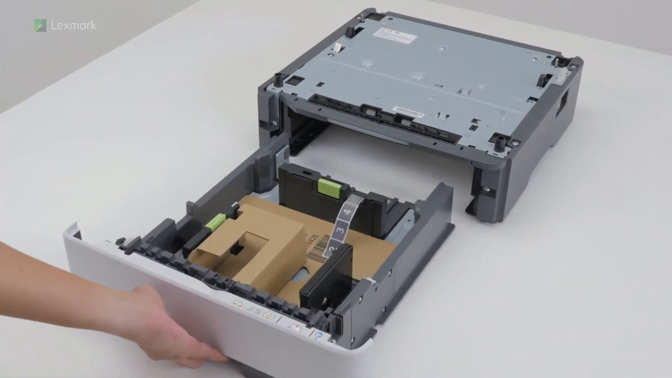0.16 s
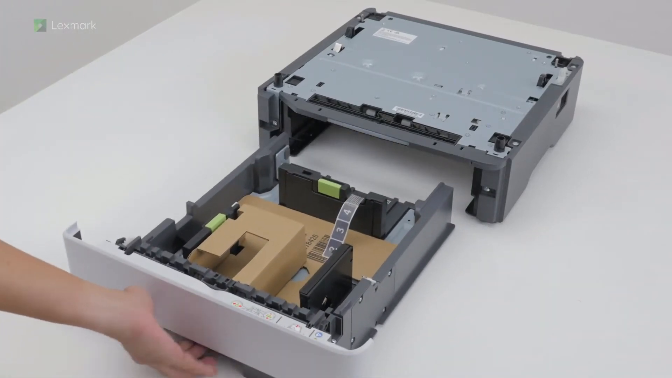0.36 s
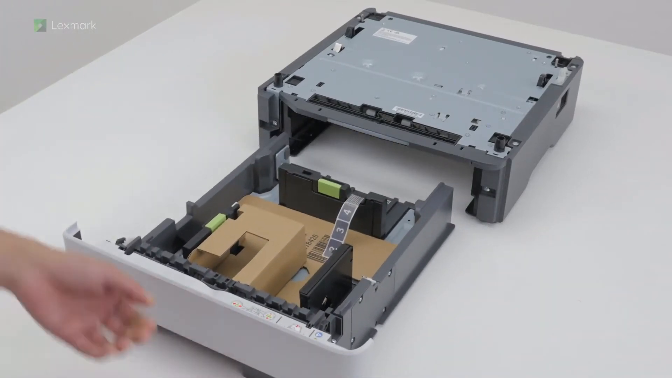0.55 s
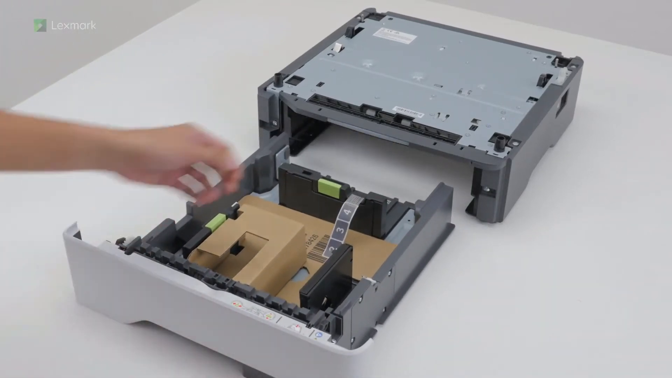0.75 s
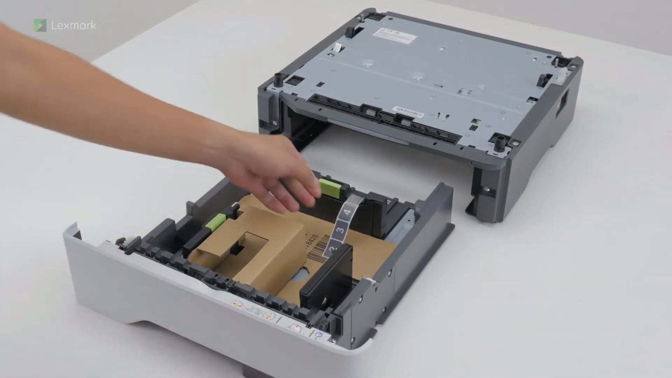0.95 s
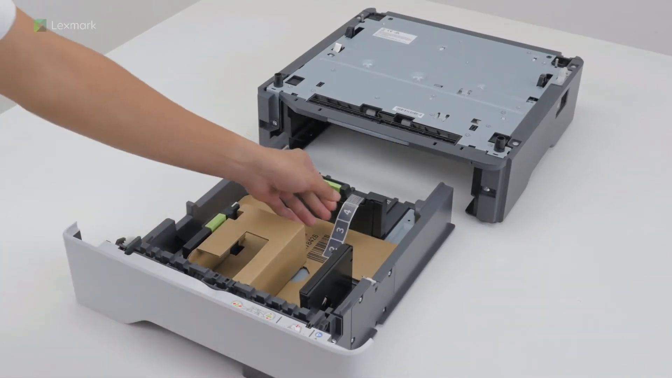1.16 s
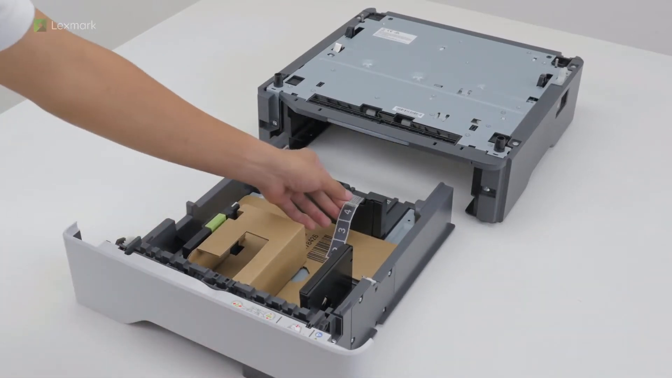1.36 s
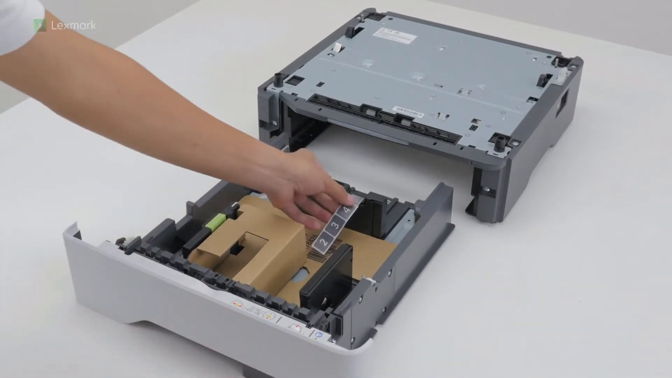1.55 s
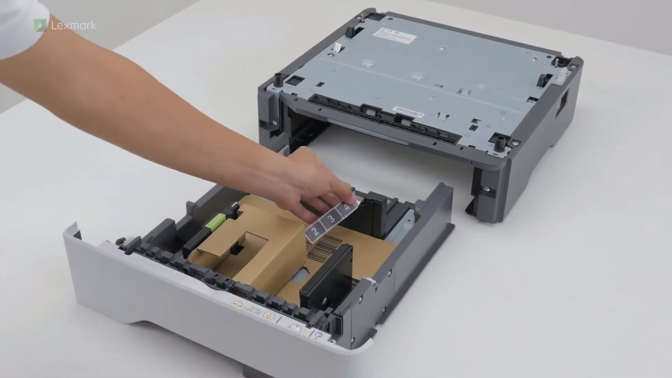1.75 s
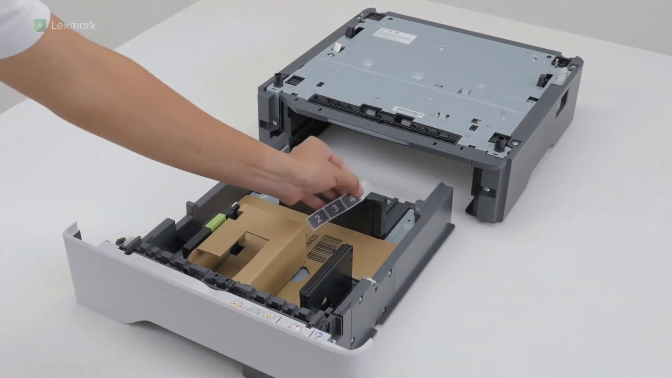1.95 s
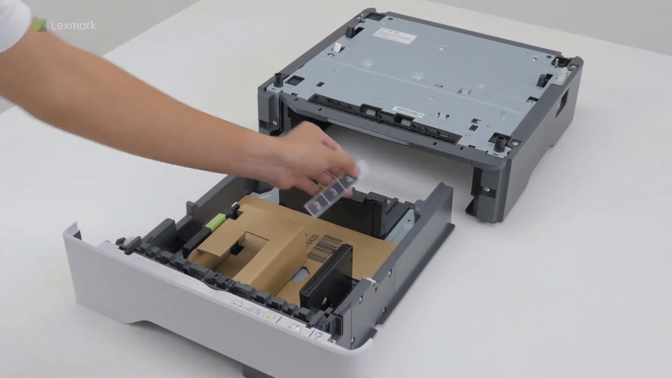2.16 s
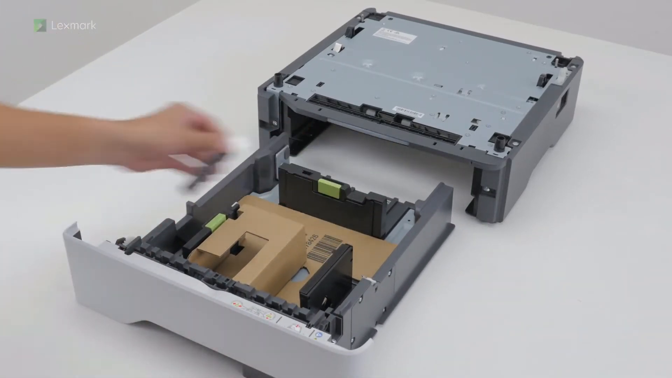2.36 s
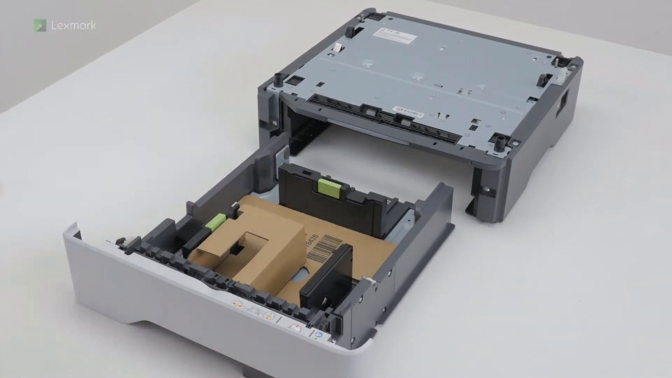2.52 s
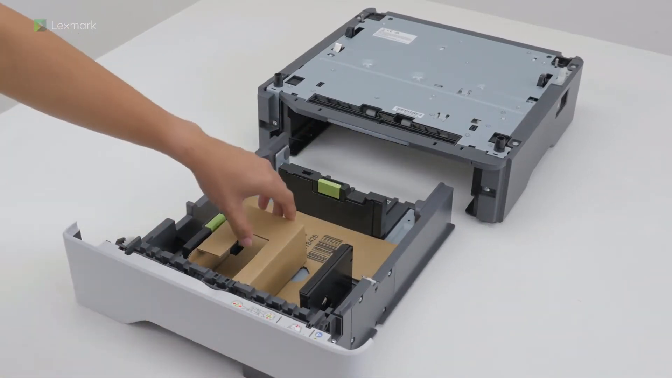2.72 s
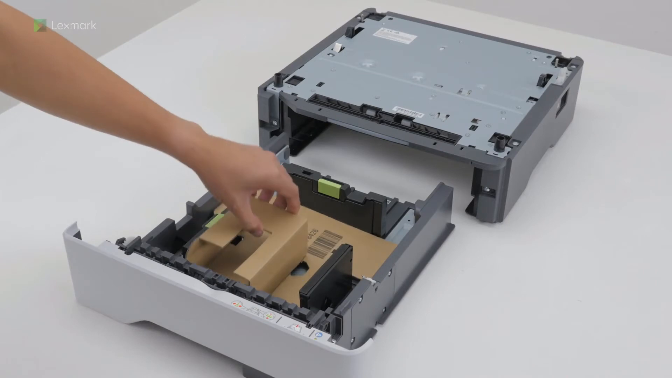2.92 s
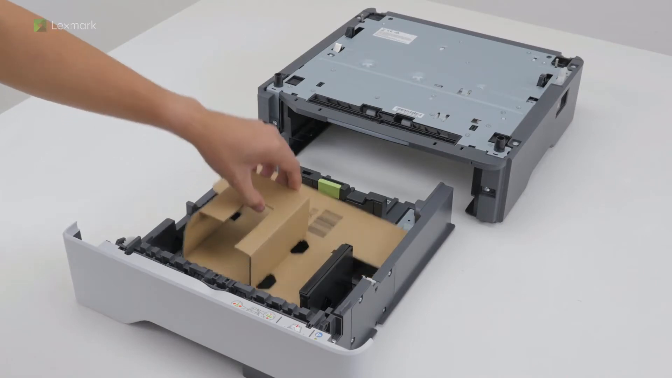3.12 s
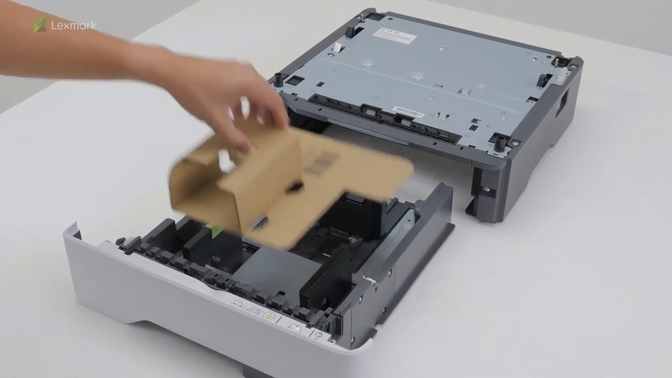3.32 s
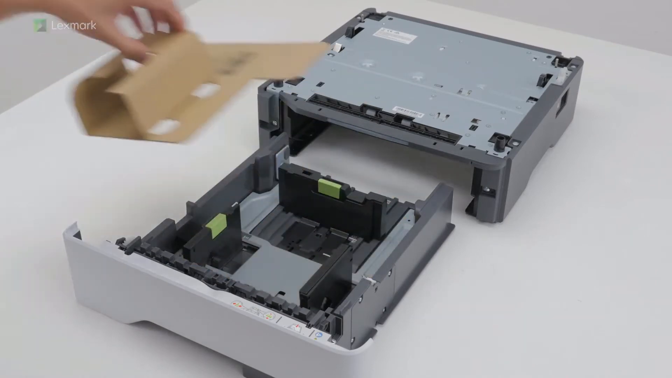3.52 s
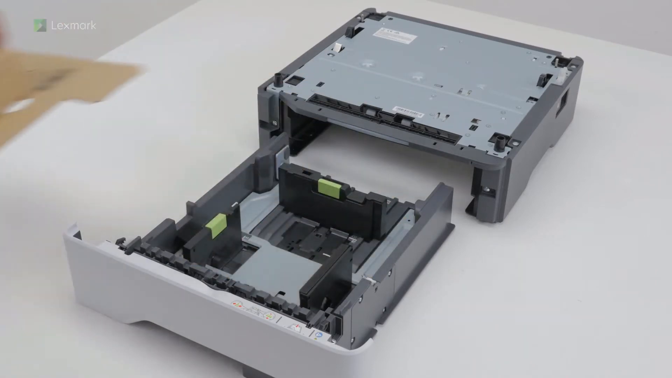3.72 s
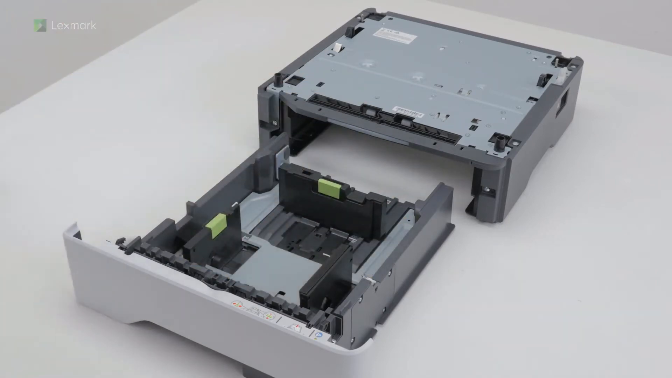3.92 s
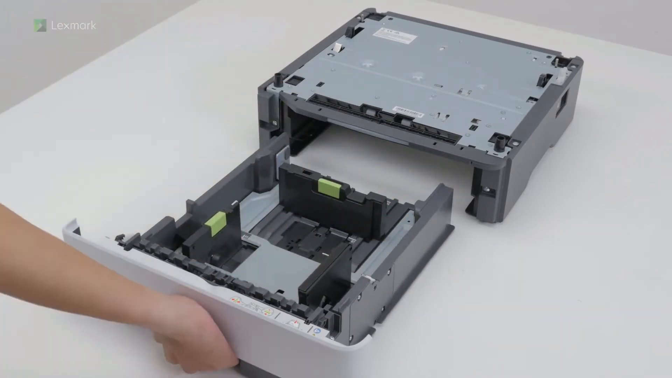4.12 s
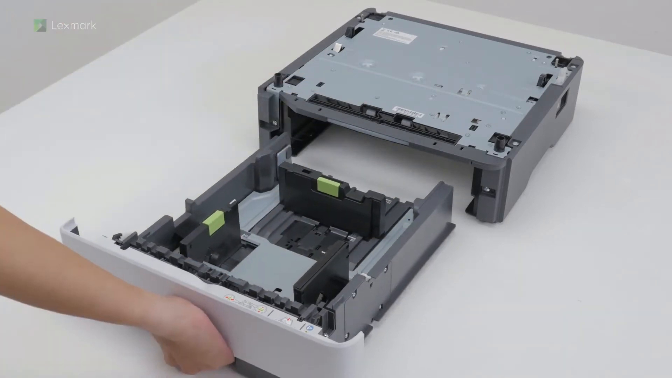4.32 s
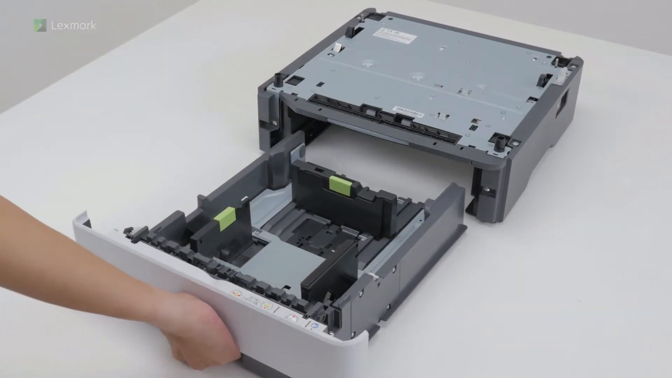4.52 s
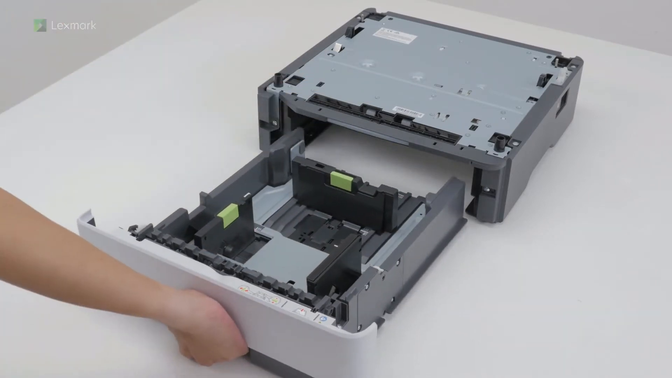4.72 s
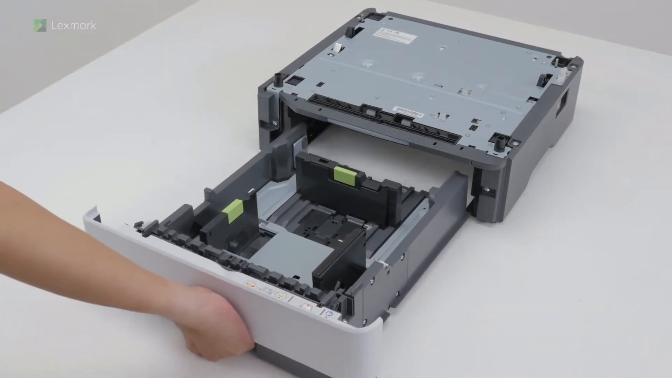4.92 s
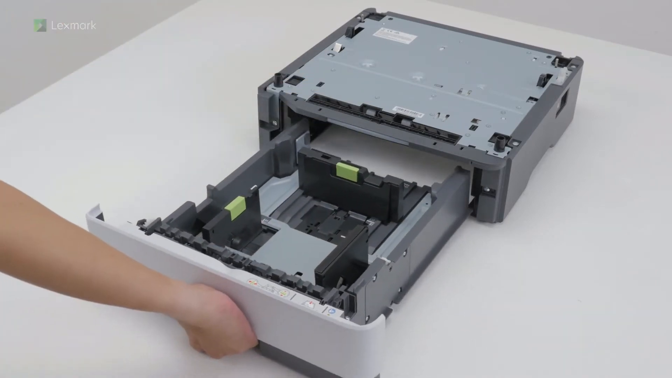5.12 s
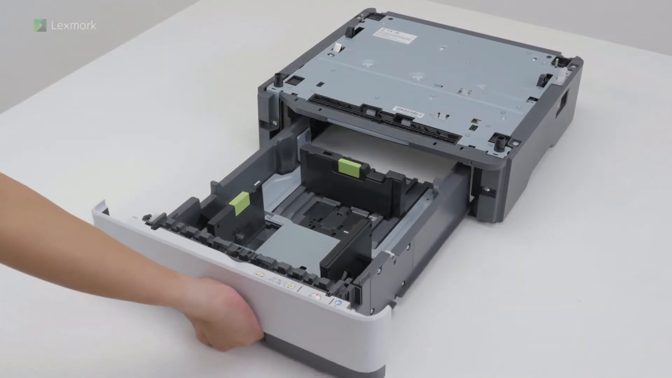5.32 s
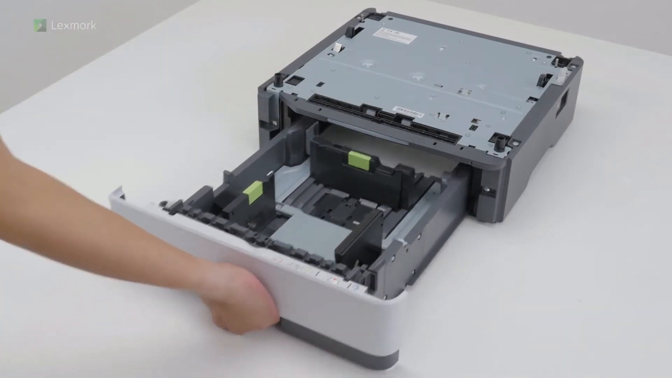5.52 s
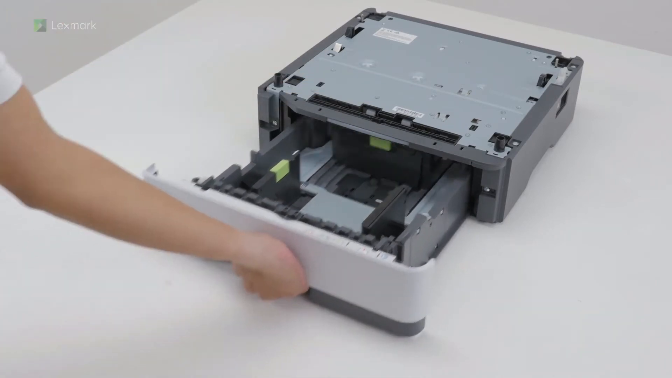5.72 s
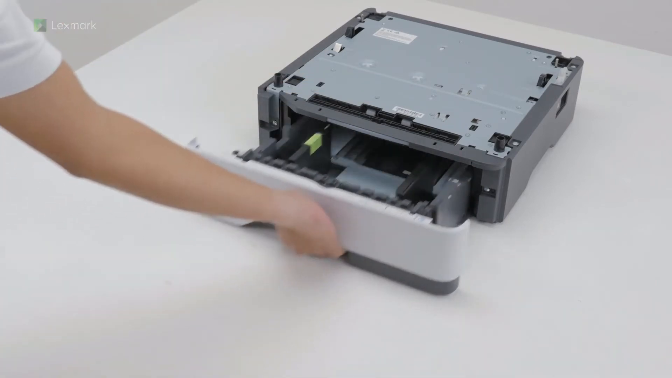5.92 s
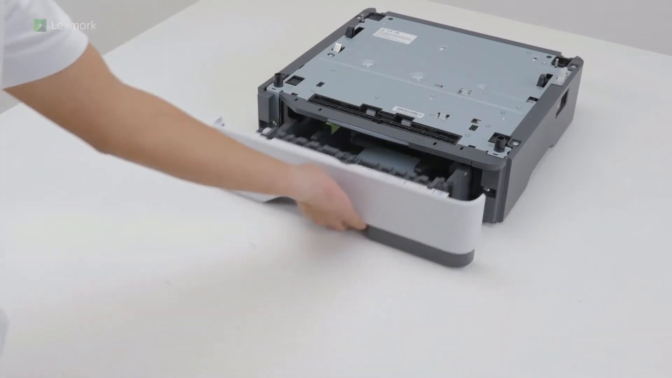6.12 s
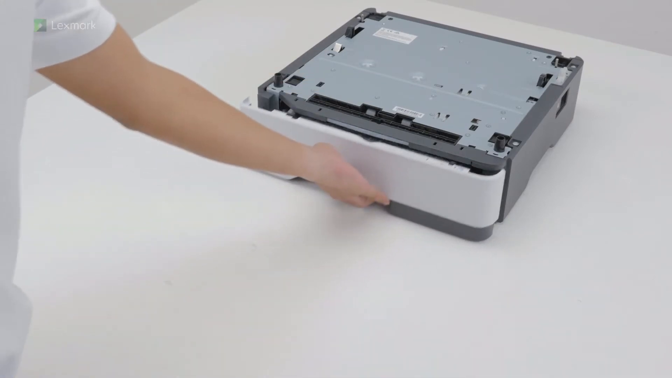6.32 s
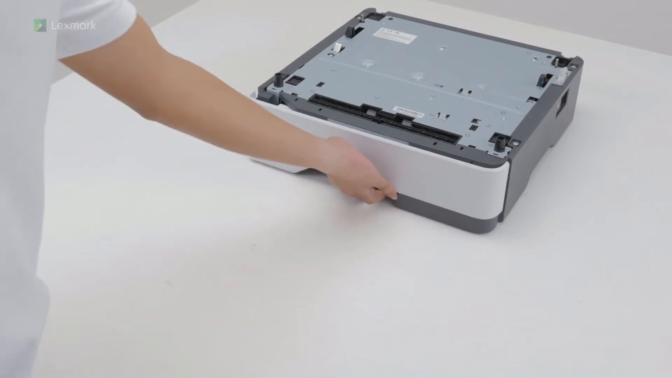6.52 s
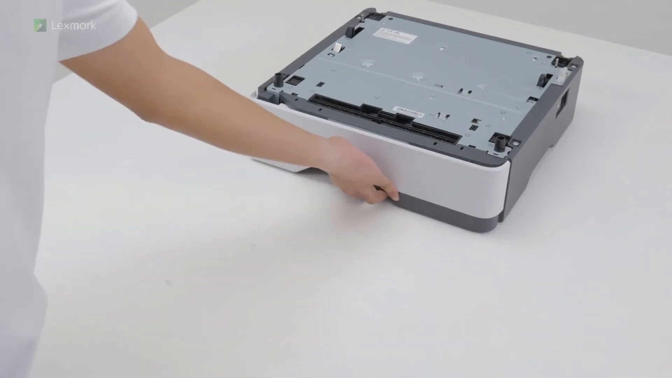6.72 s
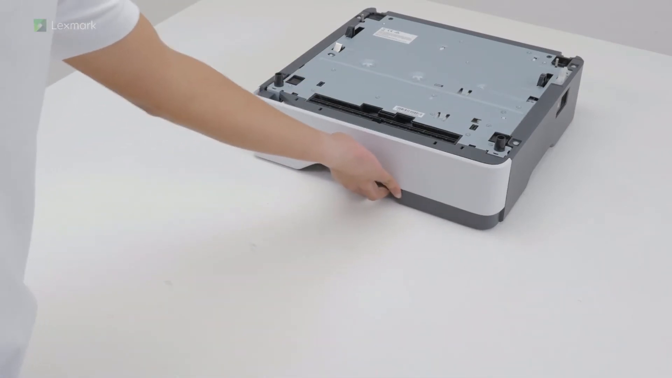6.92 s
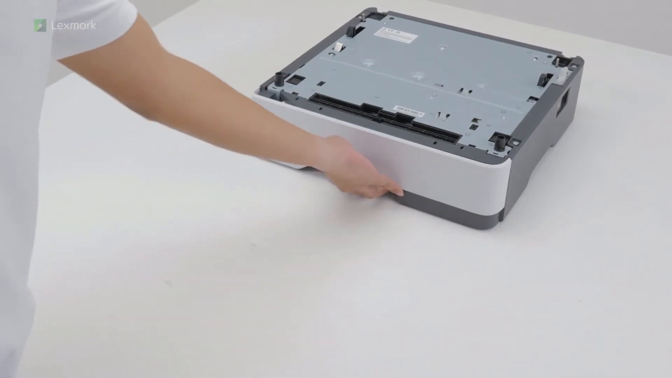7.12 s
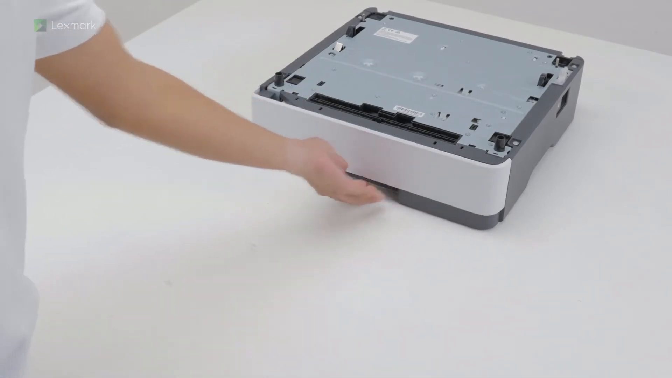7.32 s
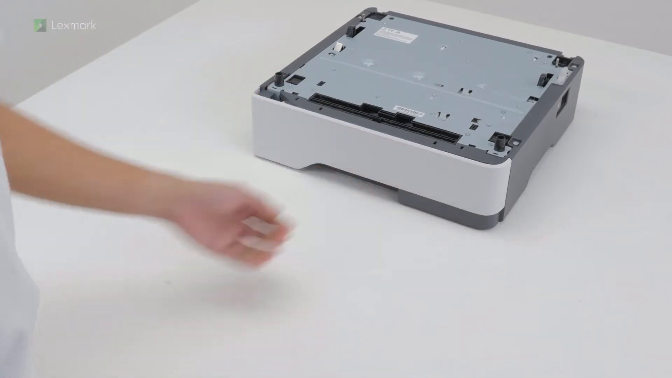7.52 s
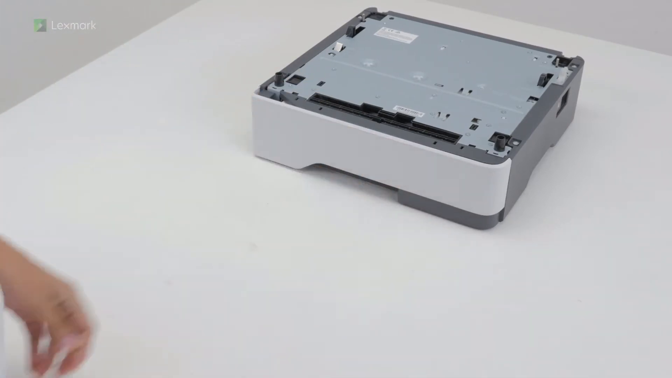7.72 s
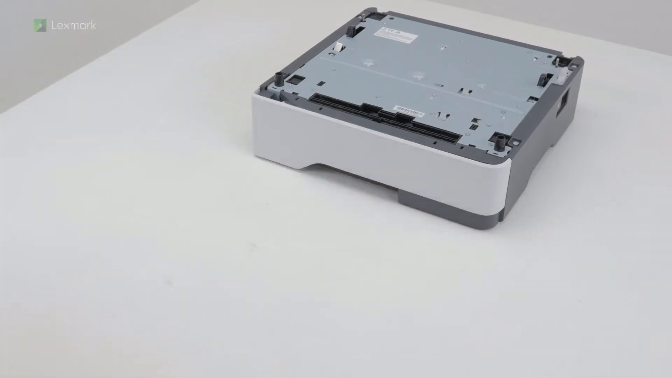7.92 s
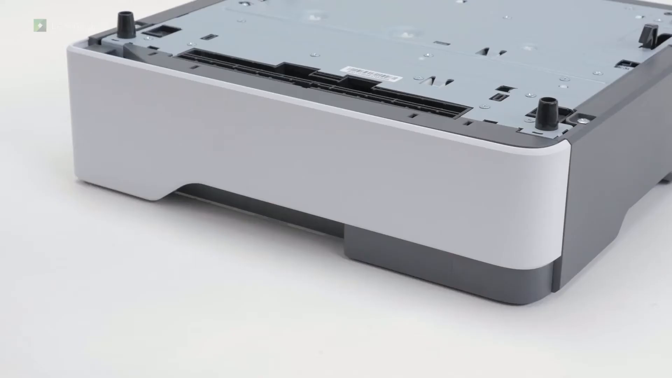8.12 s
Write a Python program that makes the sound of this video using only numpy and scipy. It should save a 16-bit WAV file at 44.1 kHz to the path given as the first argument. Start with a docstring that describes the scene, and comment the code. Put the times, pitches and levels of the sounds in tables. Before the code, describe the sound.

Tape peels and cardboard scrapes out of a plastic printer tray, which then clatters along its rails and knocks home.

```python
"""A plastic paper tray knocks, rattles and slides on a table top. It is set down, a strip of tape is
peeled off, a cardboard insert is lifted out, then the tray is raised, slid along its rails and pushed home.
Every knock rattles the loose plastic parts and booms in the table. Rubbing makes a gritty scrape, and the
tape's glue lets go in tiny snaps. Behind it all, a small room echoes and ventilation hums."""
import sys
import numpy as np
from scipy import signal
from scipy.fft import rfft, irfft, next_fast_len
from scipy.io import wavfile
from scipy.ndimage import uniform_filter1d

SR = 44100
rng = np.random.default_rng(int(sys.argv[2]) if len(sys.argv) > 2 else 0)


def wav_out(sig):
    """Save sig, one row per channel (or a flat mono array), as 16-bit PCM at SR to the path in sys.argv[1]."""
    wavfile.write(sys.argv[1], SR, np.round(np.clip(np.atleast_2d(sig).T, -1, 1) * 32767).astype(np.int16))


N = 364266

# Knocks on the tray; hardness is how strong the sharp rap is next to the dull thud:
# (time [s], thud level [dB], table boom level [dB], hardness [dB], time to fade by 60 dB [ms])
KNOCKS = [(0.108, -31.5, -24, -16, 68), (0.121, -30.5, -40.5, -10, 45), (0.247, -58, -46, -15, 62),
          (0.304, -53.5, -58, -13, 110), (0.321, -48.5, -52, -12, 75), (0.424, -56, -63, -16, 160),
          (1.954, -32.5, -40, -11.5, 54), (1.964, -36, -38, -21, 78), (2.033, -48, -57, -34.5, 42),
          (3.089, -36, -62, -14, 54), (3.102, -39.5, -40, -8, 32), (3.15, -33, -53, -13.5, 32),
          (3.174, -35, -43, -18, 210), (3.187, -49.5, -60, -2, 22), (3.193, -38.5, -42, -1.5, 140),
          (3.217, -32, -36.5, -1.5, 31), (3.239, -35, -68, -5, 11), (4, -57, -61, -20.5, 58),
          (4.129, -47, -53.5, -20, 114), (4.324, -32, -25, -14, 44), (4.335, -33.5, -43, -1, 88),
          (4.378, -24, -50, -19, 62), (4.391, -39, -29, 0, 40), (4.464, -53, -36, -14, 150),
          (4.573, -48.5, -35.5, -7, 130), (5.218, -28, -44, -22, 34), (5.224, -33.5, -34, -5.5, 150),
          (5.24, -43, -38, 7.5, 69), (5.274, -45, -37, -8, 100), (5.329, -33, -38.5, -16.5, 100),
          (5.355, -70, -60, 11.5, 40), (5.395, -69.5, -55, 12, 36), (5.446, -37.5, -61, -8, 330),
          (5.464, -36, -52, -1.5, 280), (5.525, -29.5, -33, -5, 175), (5.549, -36, -33, 1, 160),
          (5.58, -34, -48, -3, 37), (5.647, -64.5, -75, 13.5, 23), (5.731, -38, -73, -16, 58),
          (5.74, -53.5, -67, 7, 44), (5.753, -28, -43, -21.5, 85), (5.88, -39, -49.5, -9.5, 72),
          (5.906, -51.5, -52, 10.5, 72), (5.96, -36, -53, -21, 40), (5.985, -32, -46, -15, 120),
          (6.019, -42.5, -46.5, -6.5, 280), (6.116, -50, -57.5, -2, 19), (6.18, -32.5, -45, -15, 32),
          (6.307, -49, -51.5, -5, 78), (6.372, -30.5, -36.5, -8.5, 114), (6.39, -29, -40, -11.5, 46),
          (6.408, -37, -40.5, -6.5, 67), (6.459, -36, -49, 16, 24.5), (6.58, -41, -37.5, -21, 166),
          (6.629, -51.5, -43, -12.5, 70), (6.859, -54.5, -65, -20, 250), (6.903, -38.5, -46.5, -9.5, 160),
          (6.917, -26.5, -35, -9, 86), (6.928, -17, -28.5, -6, 100), (6.936, -16.5, -25, -17.5, 64),
          (6.949, -19, -31, -7.5, 75), (6.959, -23.5, -29, -5.5, 72), (6.979, -29.5, -28.5, -2, 180),
          (7.228, -51.5, -63, -10, 126)]
# The tray's floor thuds and its walls rap at these pitches: (pitch [Hz], width [Hz], level [dB])
FLOOR_TONES = [(273, 100, -1.5), (409.4, 72, 1), (492, 130, 1), (615, 186, 1.5), (778.4, 267, 3),
               (918, 338, -1.5), (1053, 310, -5)]
WALL_TONES = [(1490, 1050, -0.5), (1880, 1100, 0.5), (2444, 850, -1), (2843, 960, -2), (3790, 1800, -6.5)]
# The bright clack of thin ribs and catches: (frequency [Hz], level [dB])
RIB_SPECTRUM = [(1940, -34), (3300, -7), (4360, -1), (6650, -6), (7290, -7.5), (9880, -13.5), (12400, -16),
                (16000, -23.5)]

def tray_knocks():
    """Each blow sets off a rattle that swells, dies and rings the tray's floor, walls and ribs."""
    out, ribs = np.zeros(N), np.zeros(N)
    t = np.arange(SR // 6) / SR
    for time, thud_db, _, hardness_db, fade_ms in KNOCKS:
        fade = amp(-60e3 * t / max(fade_ms, 8)) * (1 - np.exp(-t / 0.0024))
        fade /= fade.max()
        strength = np.sqrt(np.mean(fade ** 2))
        rattle = grit(len(t), spike_db=2.0) * fade
        thud = filtered(soften(rattle, cut_hz=1800), resonances(FLOOR_TONES, scatter_db=2.0, detune=0.079))
        rap = filtered(soften(rattle, cut_hz=6440), resonances(WALL_TONES, scatter_db=5.0, detune=0.046))
        knock = amp(thud_db - 7.5) * unit(thud) + amp(thud_db + hardness_db - 3.5) * unit(rap)
        add(out, time, strength * knock)
        add(ribs, time, amp(thud_db + 4.5 + 1.124 * hardness_db) * rattle)  # harder blows clack more
    return out + patchy(filtered(ribs, causal(RIB_SPECTRUM)), depth_db=2.0)


# The tray's steel lift plate: (time [s], pitch [Hz], level [dB], time to fade by 60 dB [s])
PLATE_RINGS = [(5.231, 4880, -49.5, 0.3)]

def plate_ring():
    """The steel plate rings with one pure, fading tone."""
    out, t = np.zeros(N), np.arange(SR // 2) / SR
    for time, hz, db, fade_s in PLATE_RINGS:
        add(out, time, amp(db - 60 * t / fade_s) * np.sin(2 * np.pi * hz * t))
    return out


# The tray running on its rails: (time [s], scrape level [dB], hiss level [dB])
RAIL_SLIDE = [(5.445, -48.5, -61), (5.637, -57.5, -63), (5.735, -73, -69), (5.87, -63, -72),
              (5.89, -55, -69), (5.992, -63.5, -66.5), (6.296, -58.5, -70.5), (6.37, -56, -66.5),
              (6.446, -58.5, -71.5), (6.506, -55, -73.5), (6.644, -78, -82), (6.7, -78, -79.5)]

def rail_slide(scrape, rib_hiss):
    """Sliding makes the tray's walls scrape and its ribs hiss."""
    times, scrape_db, hiss_db = np.transpose(RAIL_SLIDE)
    return level_curve(times, scrape_db) * scrape + level_curve(times, hiss_db) * rib_hiss


# Fingers rubbing plastic, and cardboard brushing the walls:
# (start [s], peak [s], end [s], scrape level [dB], hiss level [dB])
FINGER_STROKES = [(0, .02, 0.13, -78, -88), (2.406, 2.595, 2.6, -83.5, -89), (3.75, 3.8, 4.1, -93, -93.5),
                  (4.128, 4.18, 4.35, -70.5, -80.5), (4.334, 4.513, 4.56, -61, -67),
                  (4.574, 4.68, 4.838, -67, -77.5), (4.796, 4.92, 5.06, -66.5, -78.5),
                  (5.28, 5.43, 5.45, -65, -78), (7.399, 7.503, 7.7, -82, -88),
                  (7.899, 8.078, 9, -85, -93.5)]
CARDBOARD_STROKES = [(2.725, 2.81, 2.9, -69.5, -80), (2.87, 2.93, 3.02, -65, -71),
                     (2.97, 3.05, 3.17, -66, -64.5), (3.12, 3.2, 3.12, -61.5, -71)]
# The low scrape of the walls and the hiss of cardboard fibres: (frequency [Hz], level [dB])
SCRAPE_SPECTRUM = [(180, -47), (300, 5), (800, 0), (1500, -8), (2500, -8.5), (3500, -17), (5000, -31.5),
                   (9000, -78.5)]
FIBRE_SPECTRUM = [(1060, -35), (1800, -6), (1940, -6.5), (3460, -17), (4310, -6.5), (6600, -8),
                  (12400, -10), (15800, -14)]

def rubbing():
    """Rails, fingers and cardboard rub the tray: each gives a low scrape and a high hiss."""
    scrape = friction(SCRAPE_SPECTRUM, spike_db=1.0, depth_db=3)
    rib_hiss = friction(RIB_SPECTRUM, spike_db=3, depth_db=2.2)
    fibre_hiss = friction(FIBRE_SPECTRUM, spike_db=2.5, depth_db=1.5)
    out = rail_slide(scrape, rib_hiss)
    for strokes, hiss in (FINGER_STROKES, rib_hiss), (CARDBOARD_STROKES, fibre_hiss):
        for start, peak, end, scrape_db, hiss_db in strokes:
            out += swell(start, peak, end, db=0) * (amp(scrape_db) * scrape + amp(hiss_db) * hiss)
    return out


# The table top's low notes: (pitch [Hz], level [dB], time to fade by 60 dB [s])
TABLE_TONES = [(87.6, -14, 0.29), (131.5, -9.5, 0.48), (166.9, -3.5, .16), (184.3, 3.5, 0.22),
               (242.6, -15.5, 0.29), (288.8, -14, 0.19), (341.6, -14, 0.18)]

def table_ring(scatter_db):
    """The table rings after one push; each spot gives another mix of its notes."""
    t = np.arange(SR // 2) / SR
    ring = sum(amp(db + rng.normal(0, scatter_db) - 60 * t / fade_s) * np.sin(2 * np.pi * hz * t)
               for hz, db, fade_s in TABLE_TONES)
    return ring * (1 - np.exp(-t / 0.0083))


# The tray's weight dragging on the table: (start [s], peak [s], end [s], level [dB])
DRAGS = [(4.33, 4.577, 4.53, -53.5), (5.224, 5.285, 6.05, -53), (5.414, 5.458, 5.15, -47),
         (5.56, 6.02, 6.25, -48), (6.156, 6.547, 6.56, -47.5)]

def table_boom():
    """Every knock booms in the table top, and dragging makes it rumble."""
    out = np.zeros(N)
    for time, _, boom_db, *_ in KNOCKS:
        add(out, time + 0.00091, amp(boom_db - 2.0) * table_ring(scatter_db=1.77))
    force = filtered(rng.standard_normal(N), lambda hz: 1 / (1 + (hz / 110) ** 4))
    rumble = unit(signal.fftconvolve(force, table_ring(scatter_db=3.5))[:N])
    return out + sum(swell(*drag) for drag in DRAGS) * rumble


# The loudest spots of glue letting go: (time [s], level [dB])
GLUE_SNAPS = [(1.359, -59), (1.5246, -55), (1.5403, -55), (1.546, -49), (1.562, -51), (1.5758, -51),
              (1.5933, -51), (1.6202, -49), (1.6666, -51.5), (1.6837, -42), (1.7439, -41.5), (1.7968, -56),
              (1.826, -41), (1.855, -40.5), (1.869, -43), (1.9025, -38.5), (1.9182, -44), (1.931, -36),
              (1.94, -30)]
# The tape's rasp, which follows the pull on it: (time [s], level [dB])
PEEL_LEVELS = [(1.505, -93), (1.6, -77.5), (1.74, -65.5), (1.82, -65.5), (1.86, -51), (1.89, -63.5),
               (1.941, -46), (1.971, -58)]
# The tight strip of tape rings here: (pitch [Hz], width [Hz], level [dB])
TAPE_TONES = [(2360, 1700, -5.5), (3510, 140, 5.5), (3900, 530, -1.5), (5570, 1000, 0), (7456, 2500, -3),
              (11800, 2800, -6), (14400, 3000, -9)]

def tape_peel(snaps_per_s=58, small_snap_db=-64):
    """Glue lets go in tiny snaps over a gritty rasp, and both ring the tight strip."""
    snaps, t = np.zeros(N), np.arange(400) / SR
    start, end = PEEL_LEVELS[0][0], PEEL_LEVELS[-1][0]
    draws = rng.random((round(snaps_per_s * (end - start)), 2))
    small_snaps = [(start + when * (end - start), small_snap_db - 2 * np.log(chance))
                   for when, chance in draws]
    for time, db in GLUE_SNAPS + small_snaps:
        add(snaps, time, amp(db - 4 - 60 * t / 0.0068) * rng.standard_normal(len(t)))
    rasp = level_curve(*np.transpose(PEEL_LEVELS)) * grit(N, spike_db=4.5)
    return filtered(snaps + patchy(rasp, depth_db=4.5), resonances(TAPE_TONES))


# Cardboard squeaking against a guide: (time [s], length [s], pitch [Hz], level [dB])
SQUEAKS = [(2.755, 0.11, 1304, -67), (2.885, 0.045, 557, -58), (2.982, 0.042, 513, -51.5),
           (2.997, 0.054, 695, -45), (3.035, 0.097, 699, -53.5), (4.649, 0.094, 2640, -68),
           (4.906, 0.073, 265.5, -52), (5.71, 0.047, 814.4, -46.5), (5.647, 0.0094, 3000, -37.5),
           (5.738, 0.023, 2935, -45), (5.92, 0.034, 2560, -55), (3.883, 0.064, 1450, -82.5)]

def cardboard_squeaks():
    """Cardboard sticks and slips, making short tones with a wandering pitch."""
    out = np.zeros(N)
    for time, length, hz, db in SQUEAKS:
        n = max(round(length * SR), 64)
        wander = np.cumsum(rng.normal(0, hz / 8000, n))
        phase = 2 * np.pi * hz * np.arange(n) / SR + wander
        add(out, time, amp(db) * np.hanning(n) * (np.sin(phase) + 0.14 * np.sin(2 * phase)))
    return out


# How long the small room echoes: (frequency [Hz], time to fade by 60 dB [s])
ECHO_TIMES = [(100, 0.57), (500, .35), (3000, 0.37), (12000, .22)]

def room_echo(x):
    """Each frequency dies at its own speed; a fresh random echo tail is drawn eight times a second."""
    out, step = np.zeros(N), SR // 8
    for start in range(0, N, step):
        hz, t, noise = signal.stft(rng.standard_normal(SR // 2), SR, nperseg=256)
        fade = amp(-60 * t / along(ECHO_TIMES, hz)[:, None])
        tail = signal.istft(noise * fade, SR, nperseg=256)[1]
        echo = signal.fftconvolve(x[start:start + step], tail / np.linalg.norm(tail))
        add(out, start / SR + .006, echo)
    return out


# Ventilation rumble and faint hiss: (frequency [Hz], level [dB])
AIR_SPECTRUM = [(12, -43), (20, -11.5), (22, -23), (49, -9.5), (81, -8.5), (120, -6.5), (158, -11.5),
                (210, -15), (328, -19.5), (527, -37.5), (624, -34), (849, -44), (1060, -46.5), (1710, -51),
                (16000, -65.5)]
# The fan's hum: (pitch [Hz], width [Hz], level [dB])
FAN_TONES = [(138, 4.8, -72), (615, 12, -87), (1002, 33, -100)]

def ventilation(rush_db=-61.5):
    """Air rushes steadily, and the fan adds a few fuzzy tones made of narrow bands of noise."""
    rush = unit(filtered(rng.standard_normal(N), lambda hz: amp(along(AIR_SPECTRUM, hz))))
    out = amp(rush_db) * rush
    for pitch, width, db in FAN_TONES:
        tone = filtered(rng.standard_normal(N), lambda hz: np.exp(-((hz - pitch) / width) ** 2))
        out += amp(db) * unit(tone)
    return out


def amp(db):
    """Turn decibels into a number to multiply by."""
    return 10 ** (np.asarray(db) / 20)


def unit(x):
    """Scale a sound to an average (rms) size of 1."""
    return x / np.sqrt(np.mean(x ** 2) + 1e-20)


def add(track, time, sound):
    """Mix a sound in at a time in seconds."""
    part = track[round(time * SR):][:len(sound)]
    part += sound[:len(part)]


def along(points, hz):
    """Read between (frequency, value) points, giving each octave equal room."""
    frequencies, values = np.transpose(points)
    return np.interp(np.log(hz + 1), np.log(frequencies + 1), values)


def filtered(x, response):
    """Multiply each frequency in a sound by response(frequency)."""
    n = x.shape[-1]
    padded = next_fast_len(n + 4096)
    return irfft(rfft(x, padded) * response(np.fft.rfftfreq(padded, 1 / SR)), padded)[..., :n]


def soften(x, cut_hz):
    """A soft contact passes on little treble above cut_hz."""
    return signal.sosfilt(signal.butter(2, cut_hz, fs=SR, output="sos"), x)


def causal(points):
    """A filter shaped by (frequency, level) points that rings after a hit, never before it."""
    def response(hz):
        cepstrum = irfft(np.log(amp(along(points, hz)) + 1e-6))
        cepstrum[1:len(hz) - 1] *= 2
        cepstrum[len(hz):] = 0
        return np.exp(rfft(cepstrum))
    return response


def resonances(tones, scatter_db=0, detune=0):
    """A filter that rings at the given tones; each spot struck gives other strengths and pitches."""
    hz, width, db = np.transpose(tones)[:, :, None]
    db = db + rng.normal(0, scatter_db, db.shape)
    hz = hz * (1 + rng.normal(0, detune, hz.shape))
    gain = (-1) ** np.arange(len(tones))[:, None] * amp(db)
    return lambda f: np.sum(gain * 1j * f * width / (hz * hz - f * f + 1j * f * width), axis=0)


def grit(size, spike_db):
    """Noise that comes in spiky clumps, as from many small contacts."""
    clumps = rng.exponential(1, size // 24 + 2)
    spikes = np.interp(np.arange(size) / 24, np.arange(len(clumps)), clumps)
    return unit(rng.standard_normal(size) * amp(spike_db * spikes))


def patchy(x, depth_db):
    """Narrow bands of pitch come and go as the contact wanders over the parts."""
    bands = signal.stft(x, nperseg=256)[2]
    drift = uniform_filter1d(rng.standard_normal(bands.shape), size=2, axis=0)  # smooth over pitch
    drift = uniform_filter1d(drift, size=24, axis=1)  # and over time
    return signal.istft(bands * amp(depth_db * unit(drift)), nperseg=256)[1][:N]


def friction(spectrum, spike_db, depth_db):
    """Rubbing noise: grit with the tone colour of the rubbed part."""
    coloured = filtered(grit(N, spike_db), lambda hz: amp(along(spectrum, hz)))
    return unit(patchy(coloured, depth_db))


def level_curve(times, db):
    """Loudness that follows the given points, silent before the first and after the last."""
    t = np.arange(N) / SR
    gate = np.clip(np.minimum(t - times[0], times[-1] - t) / .008, 0, 1)
    return gate * amp(np.interp(t, times, db))


def swell(start, peak, end, db, rise_db=11.5):
    """Loudness of one stroke: it grows towards its peak and is silent outside start to end."""
    return level_curve([start, peak, end], [db - rise_db, db, db - rise_db])


def scene():
    """The tray close by, the table under it, the room's echo of both and the ventilation."""
    near = tray_knocks() + plate_ring() + tape_peel() + rubbing() + cardboard_squeaks()
    boom = table_boom()
    echo = room_echo(amp(-11.5) * near + amp(-10.5) * boom)
    return (near + boom + echo + ventilation())[None]


def record(dry):
    """Take away the deepest bass and the very highest treble."""
    bass_hz, top_hz = 28, 15900
    bass_cut = lambda hz: (1j * hz / (bass_hz + 1j * hz)) ** 2
    treble_cut = lambda hz: np.clip((top_hz - hz) / 300, 0, 1)
    return filtered(dry, lambda hz: bass_cut(hz) * treble_cut(hz))


dry = scene()
out = record(dry)
wav_out(out)
```